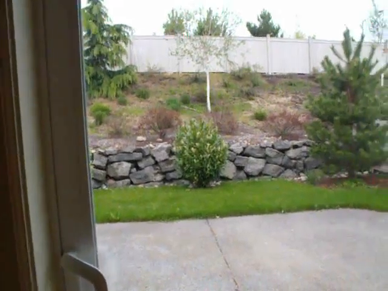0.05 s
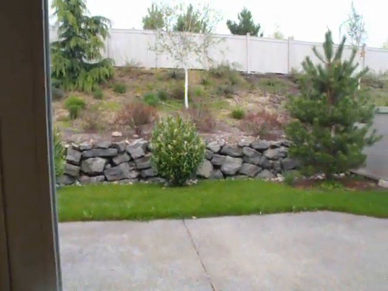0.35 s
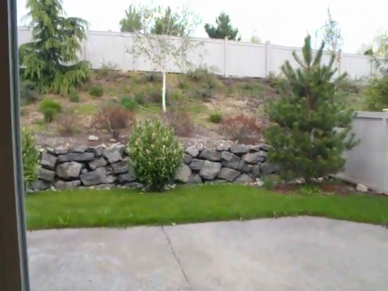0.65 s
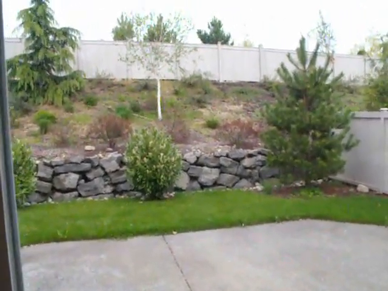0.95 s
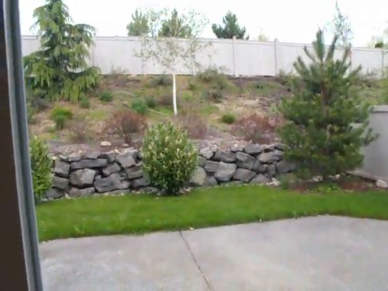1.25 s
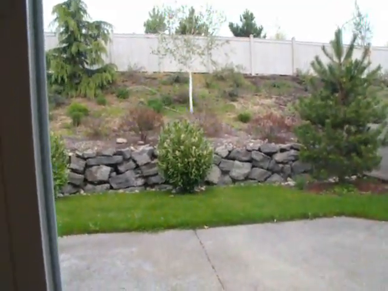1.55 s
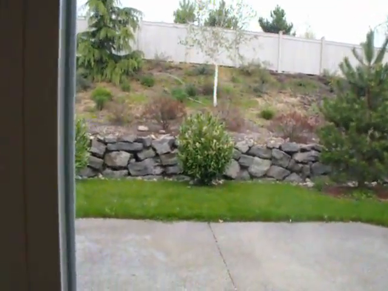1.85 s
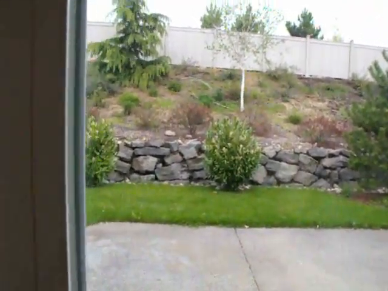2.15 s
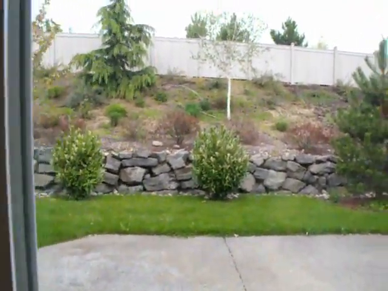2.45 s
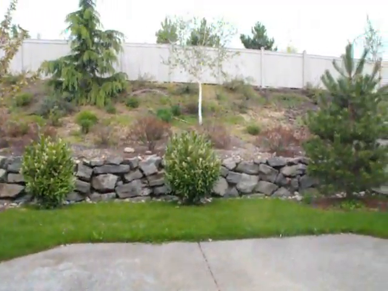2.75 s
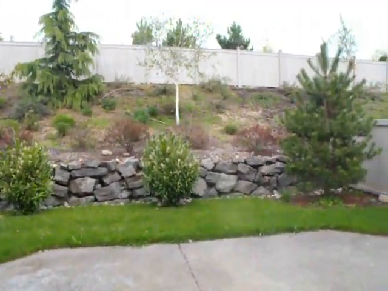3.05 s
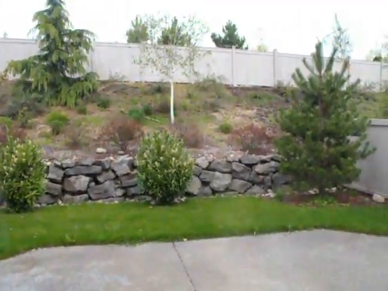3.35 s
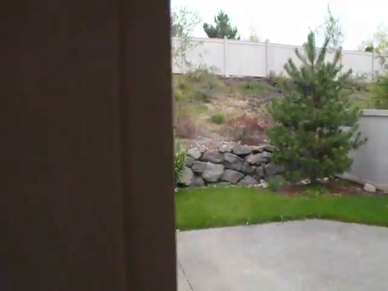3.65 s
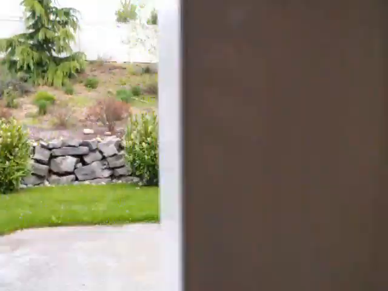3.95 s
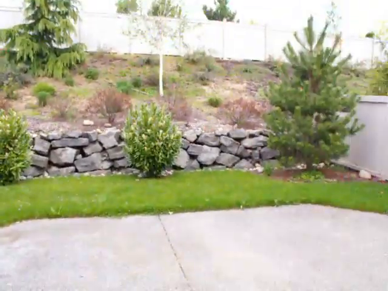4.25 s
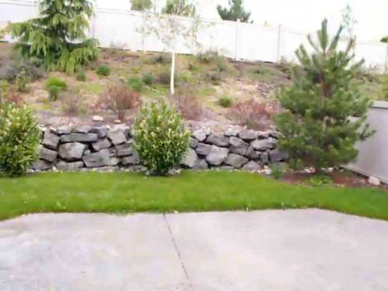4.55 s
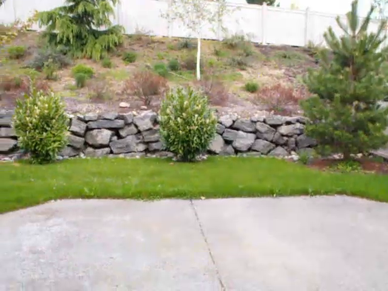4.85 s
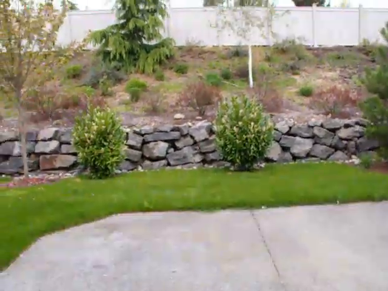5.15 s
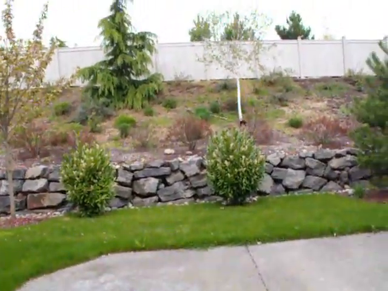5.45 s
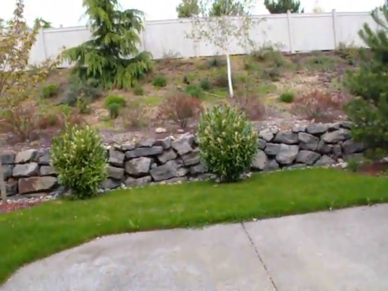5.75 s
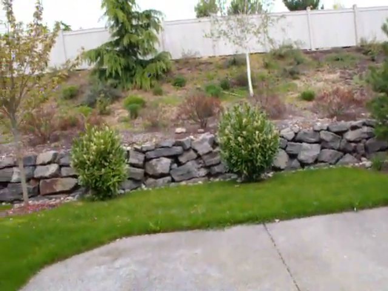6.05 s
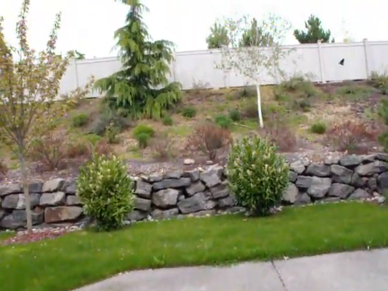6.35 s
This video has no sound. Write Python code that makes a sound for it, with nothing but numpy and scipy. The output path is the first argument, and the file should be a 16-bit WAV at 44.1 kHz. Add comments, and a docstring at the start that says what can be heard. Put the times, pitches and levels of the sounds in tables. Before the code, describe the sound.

A small, dull-sounding microphone hisses steadily inside an empty house with bare, echoing walls. From about 0.5 to 2.2 seconds a hand rubs and scrapes softly at a sliding glass door's handle, with dull bumps on the pane and a few clicks, sharpest near 1.3 seconds. The latch and frame knock and rattle between 2.3 and 2.7 seconds. Around 3 seconds the door breaks free with a short, loud clatter that overloads the microphone and rings through the room. It then rolls open with a rumble and the swish of its seal, fastest near 4.2 seconds and stopping by 4.7, with two clicks and soft, low footsteps. A faint low hum enters from outside at about 4.6 seconds. Close, dry clicks come between 5.3 and 5.8 seconds, with two tiny squeaks near 5.5. After 6 seconds there are light ticks, slight rubbing and four faint, falling bird whistles.

```python
"""In an empty house, a sliding glass door is gripped and unlatched, breaks free with a loud clatter and
rolls open. Impacts ring the modes of frame and pane, friction drives the handle and rollers, and bare
walls reverberate. Soft steps follow, then a few close clicks and squeaks; outside something hums and a
bird whistles faintly. A small narrow-band microphone hisses throughout and overloads on the clatter."""
import sys
import numpy as np
from scipy import signal
from scipy.fft import rfft, irfft
from scipy.io import wavfile

SR = 44100
rng = np.random.default_rng(int(sys.argv[2]) if len(sys.argv) > 2 else 0)


def output_pcm(signal):
    """Save a mono or channel-first signal as 16-bit PCM at the path in sys.argv[1].

    Samples are clipped to [-1, 1] before scaling.
    """
    pcm = np.clip(np.atleast_2d(signal).T, -1, 1) * 32767
    wavfile.write(sys.argv[1], SR, np.round(pcm).astype(np.int16))


N = 291060
TIME = np.arange(N) / SR


def amp(db):
    """Amplitude ratio of a level in decibels."""
    return 10 ** (np.asarray(db) / 20)


def unit_rms(x):
    """Normalisation to unit power."""
    return x / np.sqrt(np.mean(x ** 2) + 1e-20)


def at_hz(points, hz):
    """Interpolation on a log-frequency axis."""
    f, value = np.transpose(points)
    return np.interp(np.log(np.maximum(hz, 1)), np.log(f), value)


def butter(x, hz, kind, order=2):
    """Causal Butterworth filter."""
    return signal.sosfilt(signal.butter(order, hz, kind, fs=SR, output="sos"), x)


def noise(spectrum):
    """Spectral shaping of white noise, at unit rms."""
    gain = amp(at_hz(spectrum, np.arange(N // 2 + 1) * SR / N))
    return unit_rms(irfft(rfft(rng.standard_normal(N)) * gain, N))


def resonate(x, modes):
    """Modal superposition: damped resonators driven in parallel."""
    out = 0
    for hz, width, db in modes:
        r = np.exp(-np.pi * width / SR)
        poles = [1, -2 * r * np.cos(2 * np.pi * hz / SR), r * r]
        out = out + amp(db) * (1 - r * r) / 2 * signal.lfilter([1, 0, -1], poles, x + 1e-18)
    return out


def decay(t, t60):
    """Exponential damping: 60 dB lost in t60 seconds."""
    return np.exp(-np.log(1000) * t / max(t60, 1e-4))


def add(out, s, sound):
    """Superposition of a sound starting at s seconds."""
    i = max(int(s * SR), 0)
    out[i:i + len(sound)] += sound[:N - i]


def wander(hz):
    """Random fluctuation below hz, at unit rms."""
    return unit_rms(butter(rng.standard_normal(N + SR), hz, "low")[SR:])


def swell(length):
    """Progress from 0 to 1 and its half-sine envelope."""
    progress = np.linspace(0, 1, int(length * SR))
    return progress, np.sin(np.pi * progress)


def burst(envelope, low_hz, high_hz):
    """Modal overlap: many close modes struck at once act as band noise with the envelope's energy."""
    band = butter(rng.standard_normal(len(envelope)) * envelope, [low_hz, high_hz], "band")
    return unit_rms(band) * np.sqrt(np.mean(envelope ** 2))


def friction(per_s, spread_db):
    """Sliding friction as a random train of tiny, uneven slips."""
    return (rng.random(N) < per_s / SR) * rng.standard_normal(N) * amp(spread_db * wander(41))


def thuds(events, hz, t60, onset_s=0.0065):
    """A soft contact spreads its force over time, so it excites only low modes."""
    out, t = np.zeros(N), TIME[:SR // 2]
    envelope = decay(t, t60) * (1 - np.exp(-t / onset_s))
    for s, db in events:
        thud = envelope * butter(rng.standard_normal(SR), [0.45 * hz, 1.53 * hz], "band")[-len(t):]
        add(out, s, amp(db) * thud * np.linalg.norm(envelope) / np.linalg.norm(thud))
    return out


# Microphone noise spectrum: (frequency [Hz], relative level [dB])
HISS_SPECTRUM = [(15, -16.5), (28, -4.5), (64, -16), (110, -13.5), (190, -14), (500, -14.5), (800, -14.5),
                 (1020, -13), (1500, -15), (3000, -16.5), (5000, -16), (5600, -21), (6500, -21),
                 (9000, -62)]


def microphone_hiss(db=-36.5):
    """Self-noise sets a stationary noise floor."""
    return amp(db) * noise(HISS_SPECTRUM)


# Dull bumps on the pane: (time [s], level [dB])
PANE_BUMPS = [(.056, -30), (.525, -21), (1.34, -20.5), (1.394, -21), (2.06, -31.5), (2.79, -23),
              (3.01, -19.5), (3.088, -17), (3.132, -19), (6.174, -29.5)]


def pane_bumps():
    """Soft impacts excite the pane's low, quickly damped modes."""
    return thuds(PANE_BUMPS, hz=186, t60=0.12)


# Soft steps, and the door's weight as it breaks free: (time [s], level [dB])
FLOOR_LOADS = [(.108, -38), (3.09, -28.5), (4.006, -31), (4.566, -31.5), (4.78, -33)]


def floor_thuds():
    """Transient loads excite the floor's deep, slowly decaying modes."""
    return thuds(FLOOR_LOADS, hz=48, t60=0.55)


# Chattering blows: (time [s], duration [s], level [dB], bass emphasis [dB], treble emphasis [dB])
DOOR_RATTLES = [(2.3513, 0.015, -8.5, 2.5, -13), (2.486, 0.0088, -11, -4.5, -3),
                (2.995, 0.0077, -14.5, -9, -4), (3.0104, 0.035, -0.5, -12, 0.5),
                (3.086, 0.014, 1.5, -7, 3.5), (3.132, .008, 9, -10.5, -8)]


def rebounds(gap_s=0.0052, gap_scatter=0.15, spread_db=2.5, loss_db=3.5):
    """Inelastic rebound: each rattle becomes a list of quick, uneven blows that tend to weaken."""
    blows = []
    for s, length, db, bass_db, treble_db in DOOR_RATTLES:
        elapsed = 0
        for timing, strength in rng.standard_normal(size=(12, 2)):
            if elapsed < length:
                blow_db = db - loss_db * elapsed / length + spread_db * strength
                blows.append((s + elapsed, blow_db, bass_db, treble_db))
            elapsed += gap_s * (1 + gap_scatter * timing)
    return blows


# Single blows of latch and frame: (time [s], level [dB], bass emphasis [dB], treble emphasis [dB])
DOOR_BLOWS = [(.525, -31, 9, -13), (1.0035, -20.5, -12, 5), (1.285, -25.5, 1, 4), (1.338, -20.5, -2.5, 6.5),
              (1.343, -17.5, 2, 9.5), (1.3934, -24.5, 6.5, 10), (2.325, -15, -2.5, -9.5),
              (2.3414, -6.5, -3, 1.5), (2.4755, -13, -12, -2), (2.7224, -12, -7, -5),
              (2.966, -19, -13.5, 6.5), (2.977, -2, -15, -7), (3.0025, -1, -14, -3), (3.057, -24, -14, 10),
              (3.107, 1.5, -9, 3.5), (3.149, -6, -6, -5)]
# Modes of frame and pane: (frequency [Hz], bandwidth [Hz], gain [dB])
FRAME_MODES = [(308, 18, -3), (529, 36, -3), (587, 36, 3), (617.6, 14, 3), (966, 100, -2.5), (1063, 40, 2),
               (1276, 28, -4.5), (1334, 31, 6), (1440, 50, 0.5), (1684, 36, 0.5), (1712, 46, 1.5),
               (1863, 28, -11), (2080, 23, -13), (2280, 26, -15)]


def door_knocks(panel_db=-5, frame_db=6, shove_t60=0.011):
    """Impact excitation: each blow cracks, rings briefly and shoves the frame into its modes."""
    out, shove, t = np.zeros(N), np.zeros(N), TIME[:SR // 4]
    for s, db, bass_db, treble_db in DOOR_BLOWS + rebounds():
        ring_db = -14 - 0.1 * db   # light blows ring relatively more
        crack = decay(t, t60=0.0077 * amp(0.15 * (bass_db + 7.5)))   # heavy blows last longer
        # (lower edge [Hz], upper edge [Hz], T60 [s], gain [dB])
        panel = (387, 850, 0.094, bass_db + panel_db)
        frame = (1040, 2410, 0.094, 0)
        latch = (3030, 5570, 0.11, treble_db)
        for low, high, t60, part_db in (panel, frame, latch):
            envelope = crack + amp(ring_db) * decay(t, t60)
            add(out, s, amp(db + part_db) * burst(envelope, low, high))
        add(shove, s, amp(db + bass_db) * burst(decay(t, shove_t60), 240, 2700))
    return out + amp(frame_db) * resonate(shove, FRAME_MODES)


def strokes(events, rise_share=0.093):
    """Rubbing amplitude follows the square root of a pressure that builds fast and eases slowly."""
    out = np.zeros(N)
    for s, length, db in events:
        progress, _ = swell(length)
        pressure = np.interp(progress, [0, rise_share, 1], [0, 1, 0])
        add(out, s, amp(db) * np.sqrt(pressure))
    return out


# Strokes of the frame on the pane and of the hand on the handle: (time [s], duration [s], level [dB])
PANE_STROKES = [(.537, 0.23, -35), (1.533, 0.18, -36), (2.403, 0.4, -41.5), (4.087, 0.56, -37)]
HANDLE_STROKES = [(.69, 0.63, -36.5), (1.53, 0.62, -36.5), (6.14, 0.54, -41.5)]
# Modes of the rubbed parts: (frequency [Hz], bandwidth [Hz], relative gain [dB])
PANE_MODES = [(232, 34, -2.5), (282, 120, -2)]
HANDLE_MODES = [(680, 390, 1), (1310, 1200, -3), (1900, 360, 2.5), (2540, 270, 4), (4500, 790, 1)]


def rubbing():
    """Forced vibration: friction makes the pane drone and the handle scrape."""
    slips = friction(per_s=3500, spread_db=-2.5)
    drone = strokes(PANE_STROKES) * unit_rms(resonate(slips, PANE_MODES))
    scrape = strokes(HANDLE_STROKES) * unit_rms(resonate(slips, HANDLE_MODES))
    return drone + scrape


# Small close clicks: (time [s], level [dB], upper mode frequency [Hz], T60 [s])
CLICKS = [(.54, -25, 890, .06), (0.7867, -9.5, 5350, 0.0028), (1.285, -4.5, 5370, 0.0064),
          (2.454, -15, 5300, .006), (2.854, -19.5, 5000, 0.014), (3.7842, -7.5, 5040, .012),
          (4.0993, -6.5, 4200, 0.0052), (5.293, -10.5, 4070, 0.02), (5.3457, -6, 2870, .0056),
          (5.357, -18, 2700, .008), (5.4282, -4, 4360, 0.01), (5.429, -18.5, 1690, 0.074),
          (5.727, -23, 2600, 0.056), (5.745, -18, 2400, 0.035), (5.749, -7.5, 2375, 0.062),
          (5.8152, -23, 2130, 0.037), (6.0602, -24.5, 4300, .04), (6.378, -26, 1490, .12),
          (6.405, -21.5, 4880, 0.026)]


def clicks(lower_ratio=0.62, lower_db=-13.5, grit_db=-8, tail_db=-23, tail_t60=0.1):
    """Free vibration: a snap rings two heavily damped modes of a small part, with a gritty edge."""
    out, t = np.zeros(N), TIME[:SR // 8]
    for s, db, hz, t60 in CLICKS:
        lower_hz = lower_ratio * hz
        modes = np.sin(2 * np.pi * hz * t) + amp(lower_db) * np.sin(2 * np.pi * lower_hz * t)
        grit_envelope = amp(grit_db) * decay(t, t60) + amp(tail_db) * decay(t, tail_t60)
        grit = burst(grit_envelope, 0.72 * lower_hz, 1.3 * hz)
        add(out, s, amp(db) * (0.78 * modes * decay(t, t60) + grit))
    return out


# Modes of pane and track under the rollers: (frequency [Hz], bandwidth [Hz], relative gain [dB])
TRACK_MODES = [(250, 23, -20), (343, 67, 8.5), (486, 89, 9), (621.4, 90, 10.5), (743, 69, 6), (915, 95, 4),
               (1132, 49, 4), (1580, 86, -24)]


def rollers(speed, top_db=-29):
    """Roughness excitation: rollers cross the track's grit, rumbling as a power of the door's speed."""
    rumble = unit_rms(resonate(friction(per_s=2800, spread_db=-0.5), TRACK_MODES))
    return amp(top_db) * speed ** 0.68 * rumble


# Swish of the brush seal: (frequency [Hz], relative level [dB])
SEAL_SPECTRUM = [(600, -6.5), (1500, -2), (3000, -6), (4700, 0), (7000, -13)]


def brush_seal(speed, top_db=-36, peel_s=3.1, peel_db=-19, peel_t60=1.27):
    """Incoherent addition: the seal's sliding swish and its dying peel from the jamb sum in power."""
    swish = amp(top_db) * speed ** 0.23
    peel = amp(peel_db) * decay(np.abs(TIME - peel_s), peel_t60) * (TIME > peel_s)
    return noise(SEAL_SPECTRUM) * np.hypot(swish, peel)


def outdoor_hum(start_s=4.56, hz=99, waver_hz=3.3, db=-50, rise_s=0.24):
    """A low tone, randomly modulated in frequency and amplitude, enters through the open door."""
    cycles = np.cumsum(hz + waver_hz * wander(8.9)) / SR
    tone = np.sqrt(2) * np.sin(2 * np.pi * cycles)
    onset = np.clip((TIME - start_s) / rise_s, 0, 1)
    return amp(db + 2 * wander(5.3)) * tone * onset


# Close squeaks: (time [s], duration [s], level [dB])
SQUEAK_SLIPS = [(5.473, 0.051, -23), (5.537, 0.05, -31)]
# Their partials: (frequency at peak pressure [Hz], relative level [dB])
SQUEAK_PARTIALS = [(2030, -6), (3400, -2.5), (4750, -5), (6400, -10.5)]


def squeaks(arch=0.09, roughness=0.023, rasp=0.76):
    """Friction-induced oscillation: a slipping contact sings raspily, its pitch arching with pressure."""
    out, jitter = np.zeros(N), wander(400)
    for peak_hz, partial_db in SQUEAK_PARTIALS:
        flutter = 1 + rasp * wander(380)
        for s, length, db in SQUEAK_SLIPS:
            _, pressure = swell(length)
            span = slice(int(s * SR), int(s * SR) + len(pressure))
            hz = peak_hz * (1 + arch * (pressure - 1) + roughness * jitter[span])
            tone = np.sin(2 * np.pi * np.cumsum(hz) / SR)
            add(out, s, amp(db + partial_db) * pressure ** 2 * flutter[span] * tone)
    return out


# Distant whistles: (time [s], duration [s], starting frequency [Hz], level [dB])
BIRD_WHISTLES = [(6.197, .08, 5260, -39), (6.287, 0.054, 5130, -37), (6.374, 0.047, 5250, -35),
                 (6.469, 0.099, 3460, -35)]


def bird(hold_share=0.38, end_ratio=0.68, waver=0.016):
    """Frequency modulation of a pure tone: each whistle holds its pitch, then slides down unsteadily."""
    out, jitter = np.zeros(N), wander(220)
    for s, length, start_hz, db in BIRD_WHISTLES:
        progress, power = swell(length)
        glide = np.interp(progress, [hold_share, 1], [1, end_ratio])
        hz = start_hz * glide * (1 + waver * jitter[int(s * SR):][:len(progress)])
        tone = np.sin(2 * np.pi * np.cumsum(hz) / SR)
        add(out, s, amp(db) * np.sqrt(np.abs(power)) * tone)
    return out


# Reverberation time: (frequency [Hz], T60 [s])
REVERB_TIMES = [(150, 1), (500, 0.92), (1500, 0.66), (3000, 0.79), (6000, 0.71)]
# Reverberant gain: (frequency [Hz], level re input [dB])
REVERB_LEVELS = [(150, 7.5), (500, -9.5), (1500, -7.5), (3000, -8.5), (6000, -11)]


def room(x, build_s=0.0037):
    """Reverberation: bare walls build a diffuse field that decays at its own rate in each band."""
    t, tail = TIME[:SR], 0
    edges_hz = np.geomspace(90, 8000, 8)
    for low, high in zip(edges_hz, edges_hz[1:]):
        hz = np.sqrt(low * high)
        envelope = decay(t, at_hz(REVERB_TIMES, hz)) * (1 - np.exp(-t / build_s))
        band = butter(rng.standard_normal(SR), [low, high], "band", order=3)
        tail = tail + amp(at_hz(REVERB_LEVELS, hz)) * band * envelope / np.linalg.norm(envelope)
    return signal.fftconvolve(x, tail)[:N]


def scene(close_room_db=-12, bird_room_db=3, push_s=2.79, fastest_s=4.2, stop_s=4.73):
    """Direct and reverberant fields superpose; the closer the source, the drier it sounds."""
    knocks, close, whistles = door_knocks(), clicks() + squeaks(), bird()
    reverb = room(knocks + amp(close_room_db) * close + amp(bird_room_db) * whistles)
    background = microphone_hiss() + outdoor_hum() + whistles
    bumps = pane_bumps() + floor_thuds()
    speed = np.interp(TIME, [push_s, fastest_s, stop_s], [0, 1, 0])   # share of the door's top speed
    sliding = rollers(speed) + brush_seal(speed)
    return (knocks + close + reverb + bumps + sliding + rubbing() + background)[None]


def record(dry, overload=0.94, rolloff_hz=5500, cutoff_hz=6400, top_hz=16000):
    """Clipping distortion: the input overloads, and peaks that overshoot in the filters clip again."""
    dull = butter(np.clip(dry, -overload, overload), rolloff_hz, "low", order=8)
    narrow = signal.sosfilt(signal.ellip(9, 0.1, 90, cutoff_hz, fs=SR, output="sos"), dull)
    return butter(np.clip(narrow, -1, 1), top_hz, "low", order=8)


dry = scene()
out = record(dry)
output_pcm(out)
```